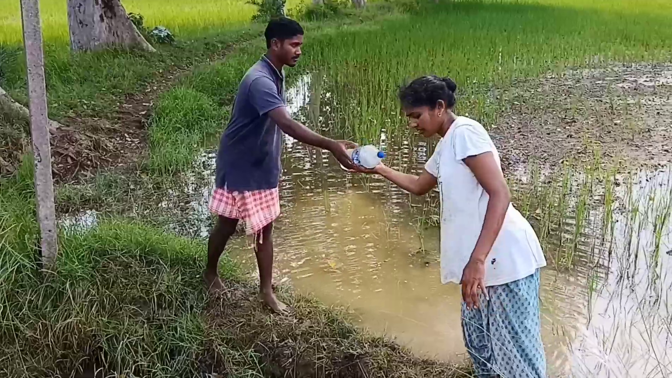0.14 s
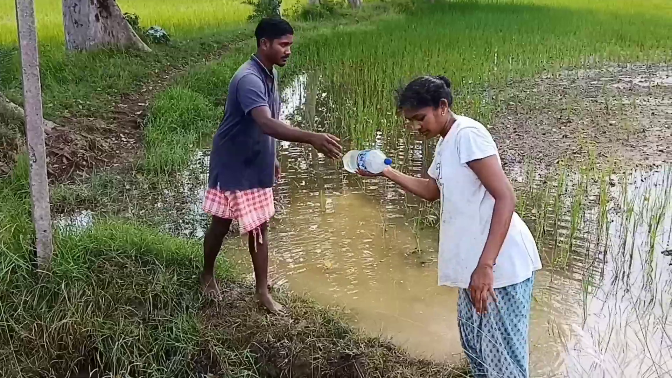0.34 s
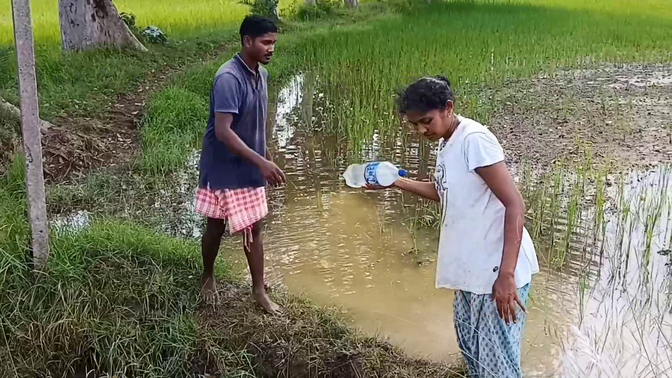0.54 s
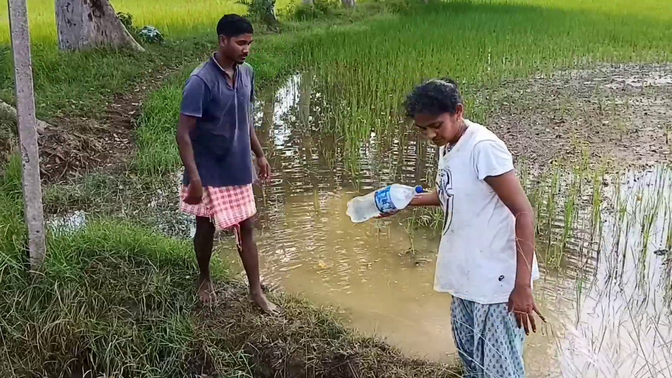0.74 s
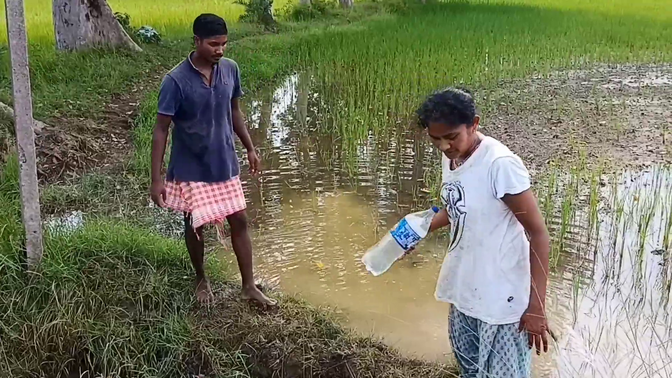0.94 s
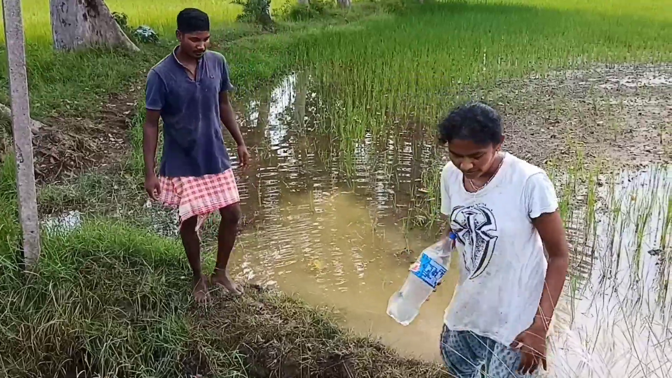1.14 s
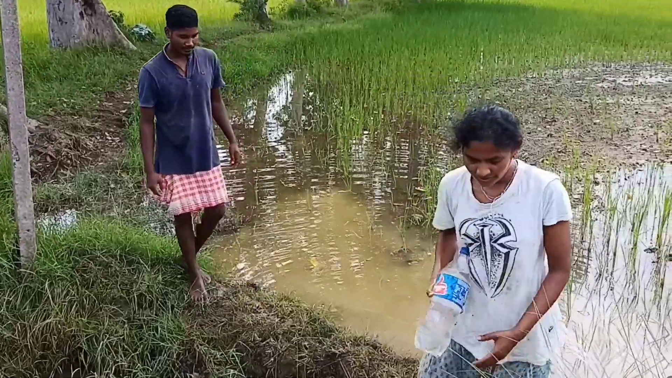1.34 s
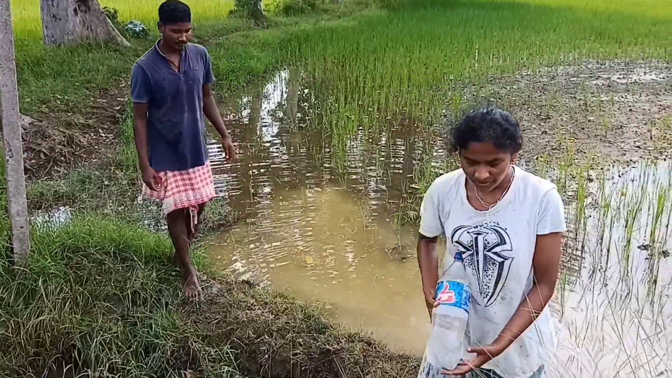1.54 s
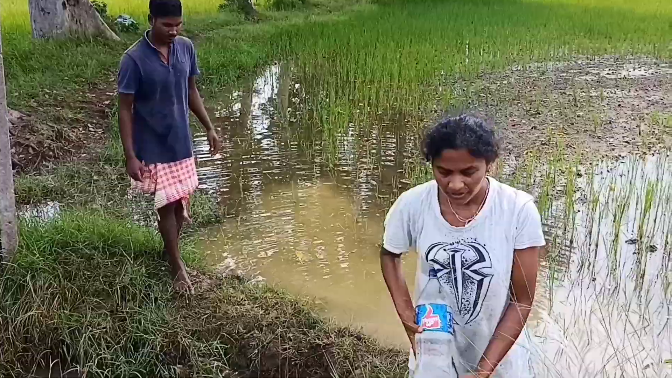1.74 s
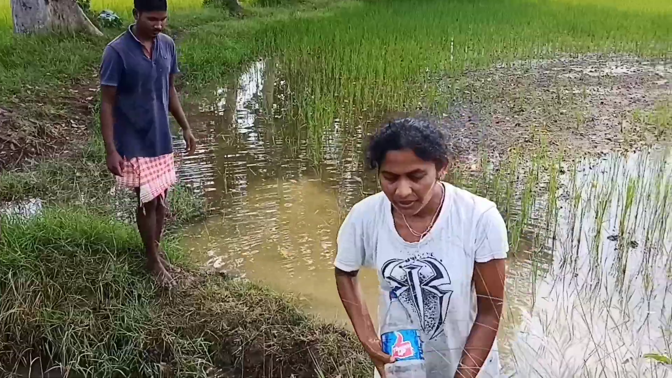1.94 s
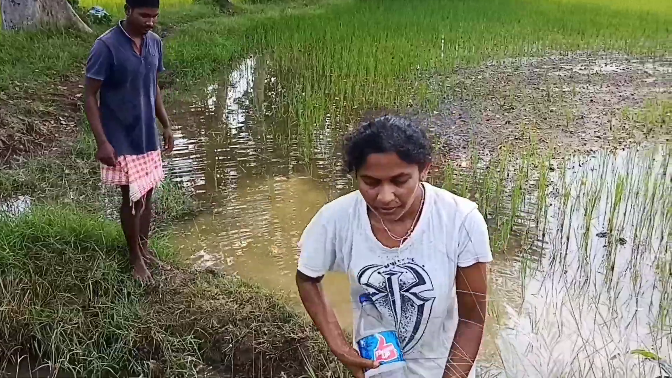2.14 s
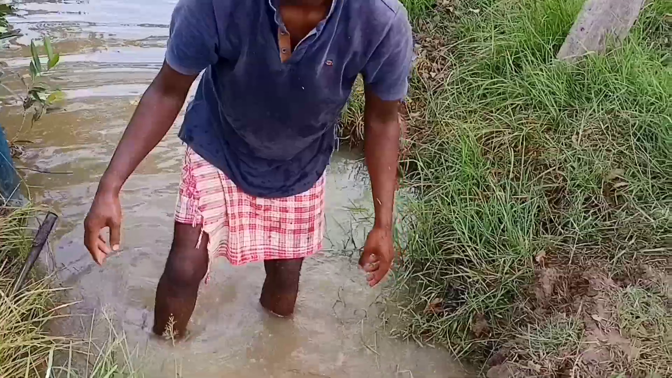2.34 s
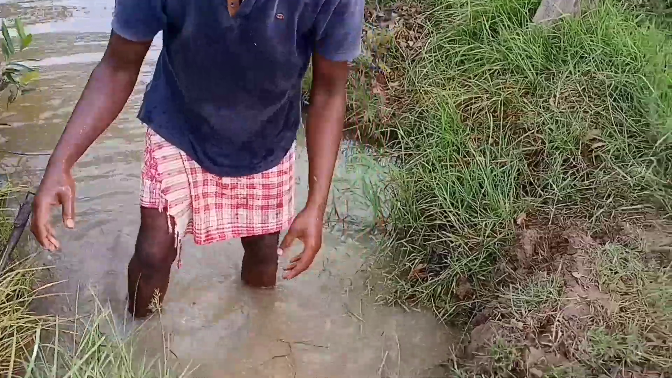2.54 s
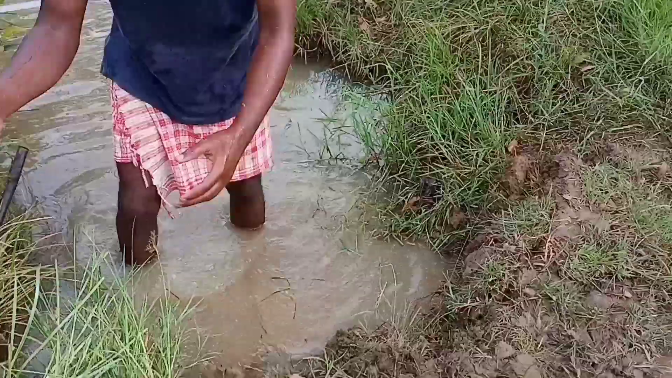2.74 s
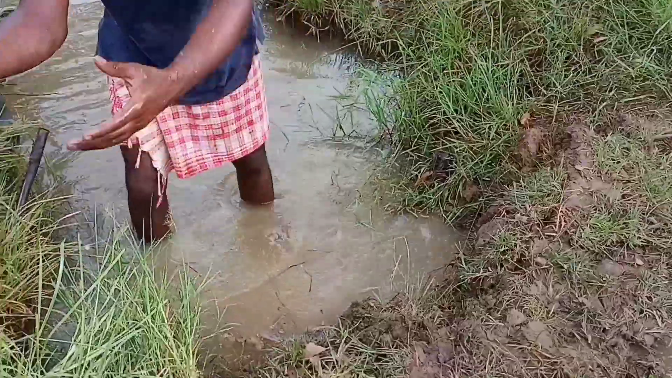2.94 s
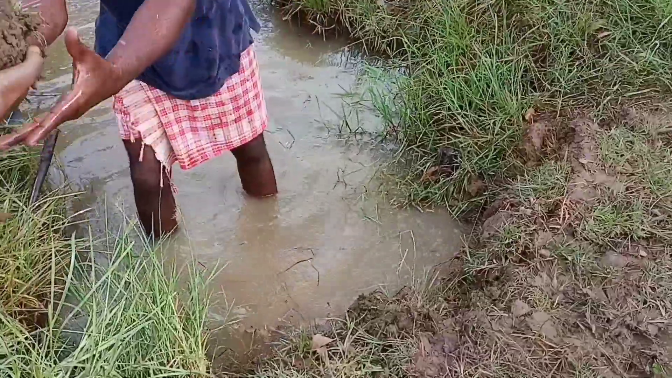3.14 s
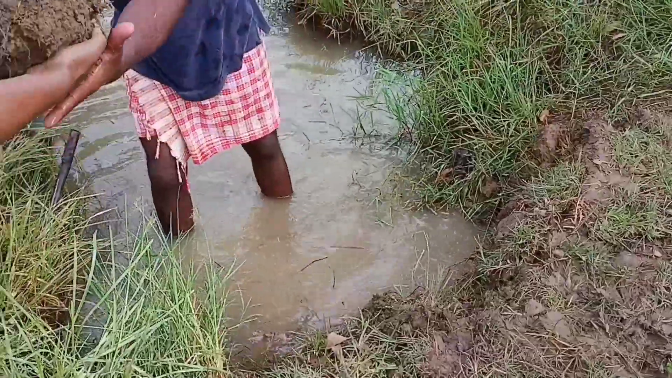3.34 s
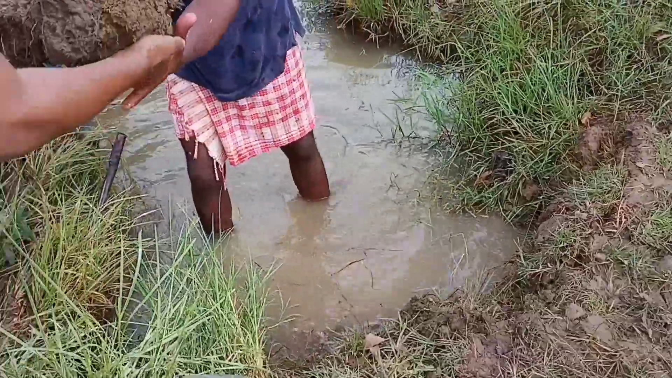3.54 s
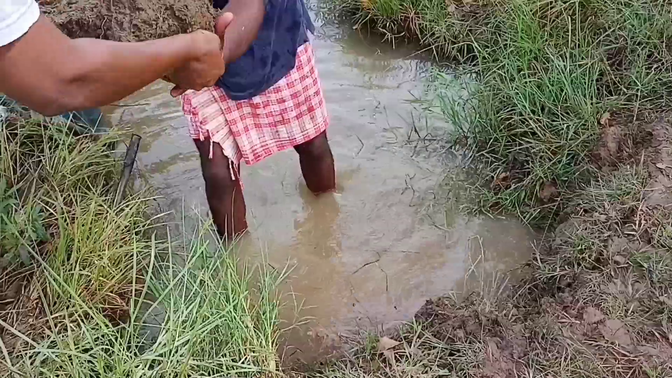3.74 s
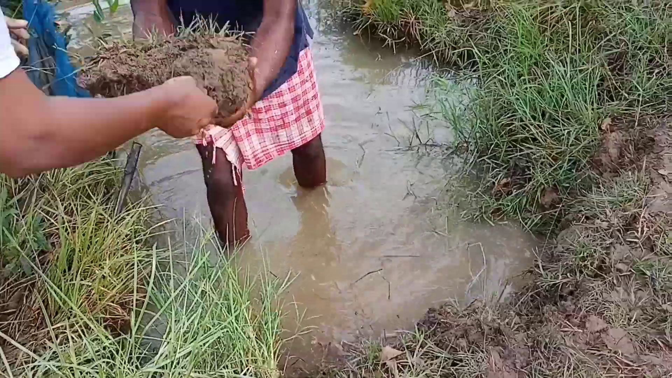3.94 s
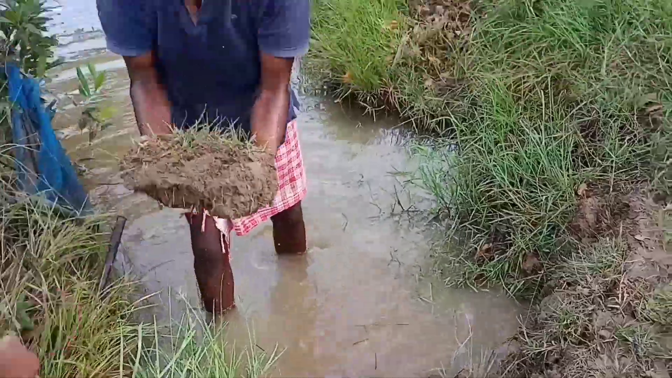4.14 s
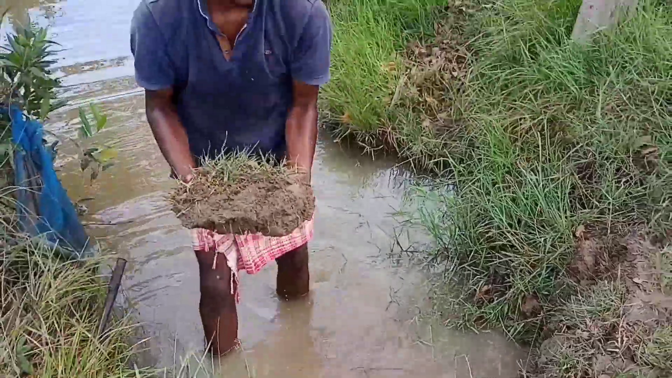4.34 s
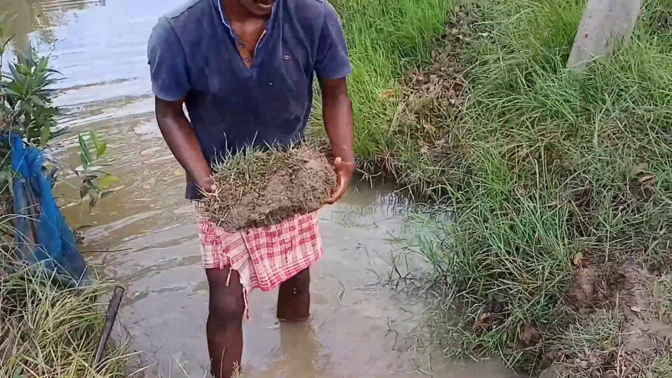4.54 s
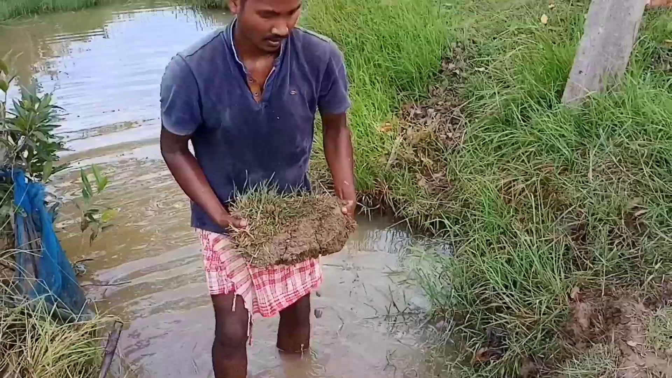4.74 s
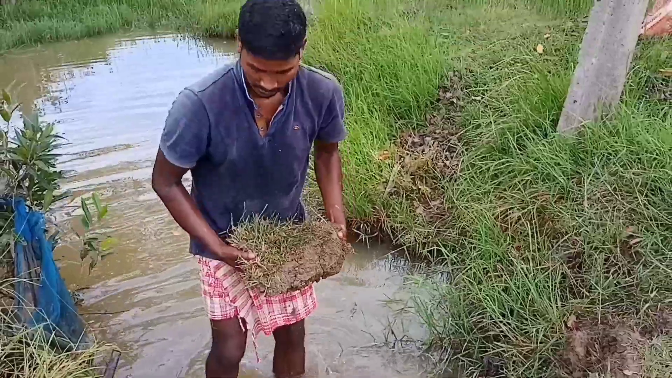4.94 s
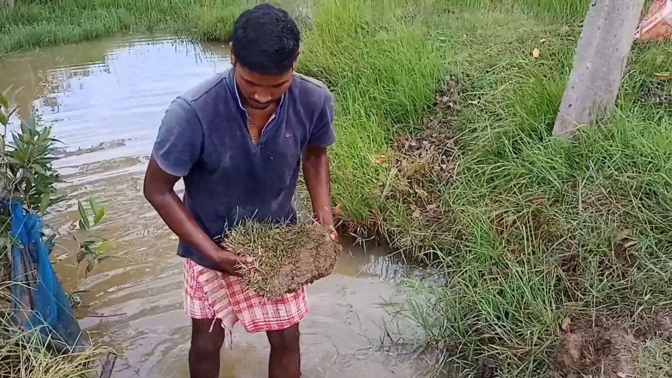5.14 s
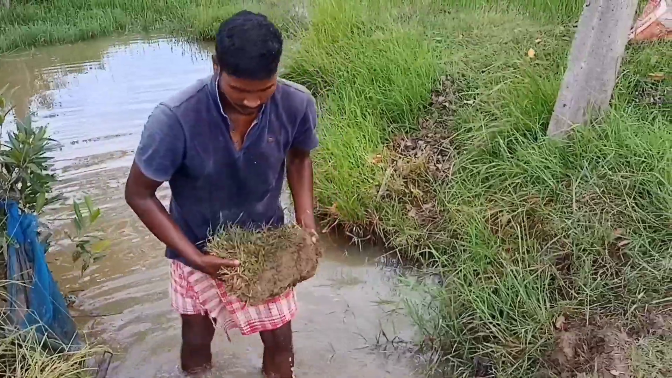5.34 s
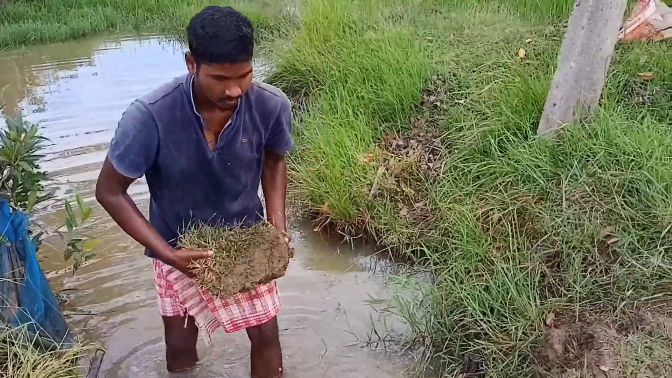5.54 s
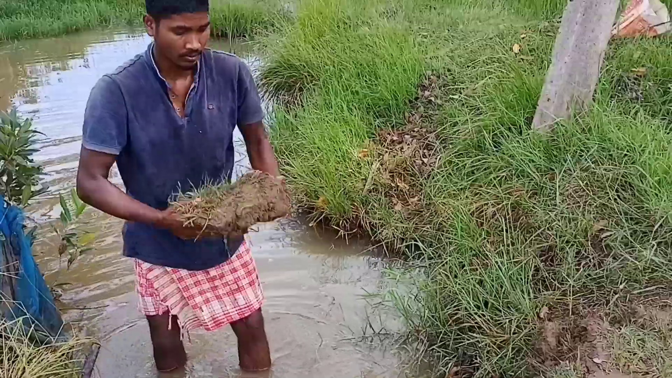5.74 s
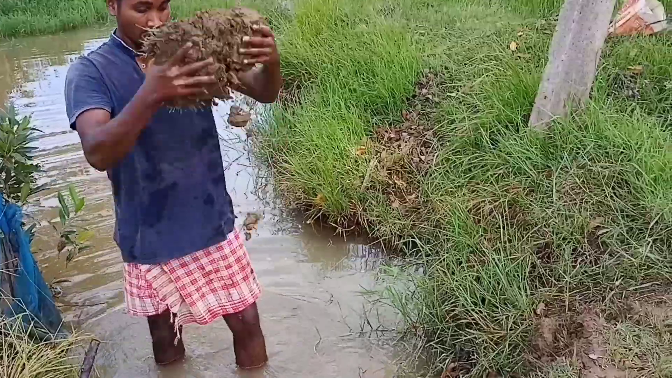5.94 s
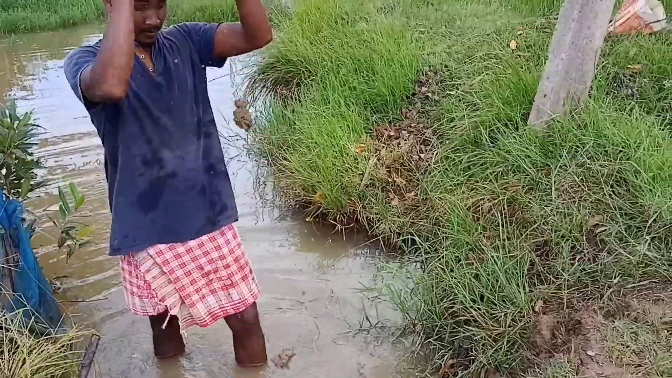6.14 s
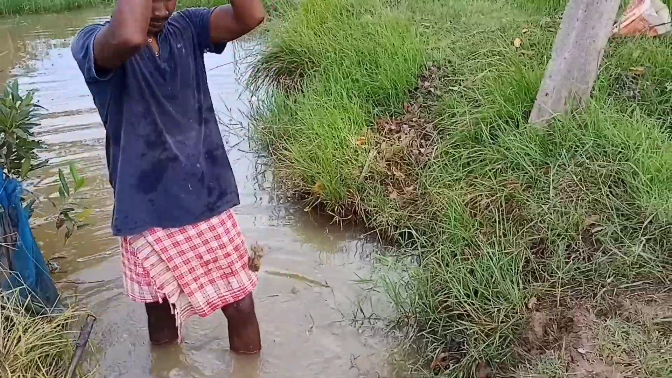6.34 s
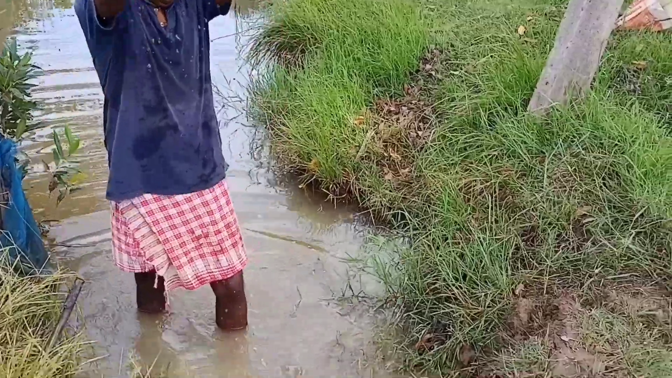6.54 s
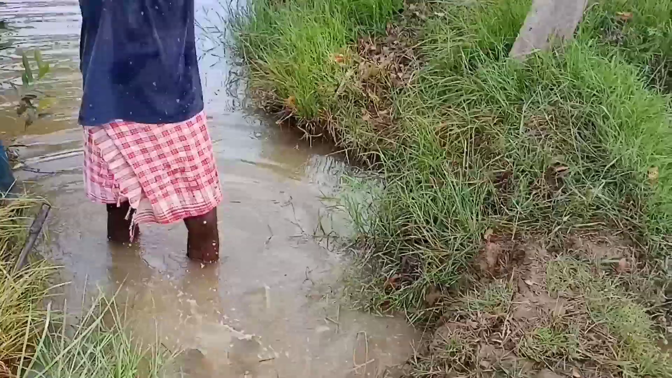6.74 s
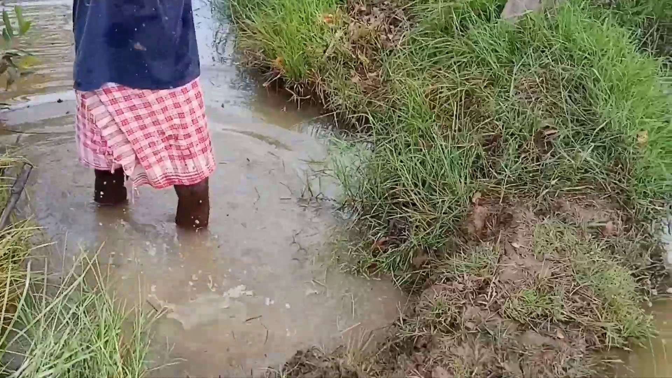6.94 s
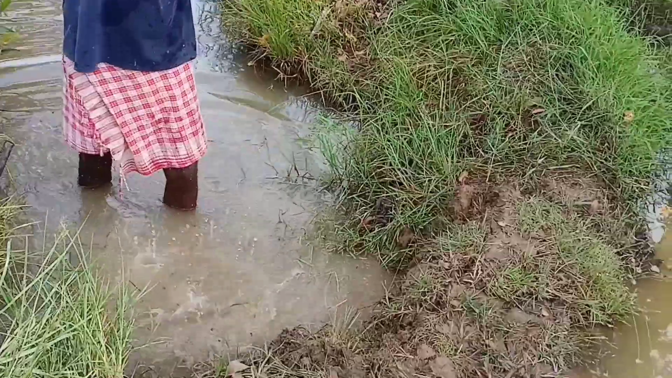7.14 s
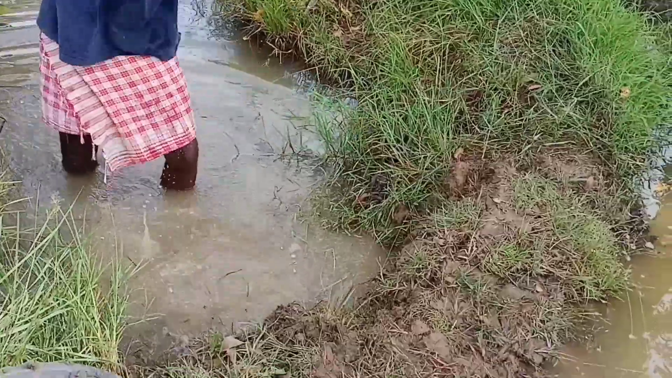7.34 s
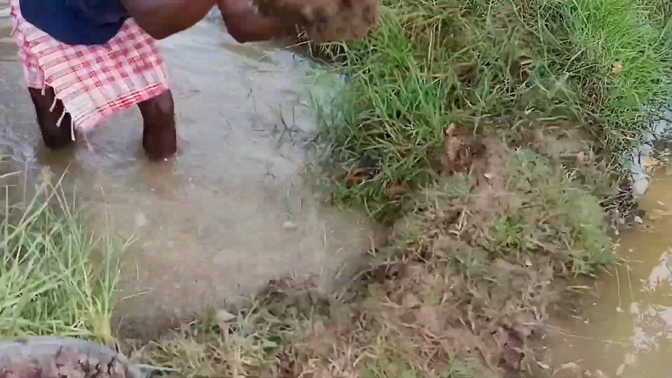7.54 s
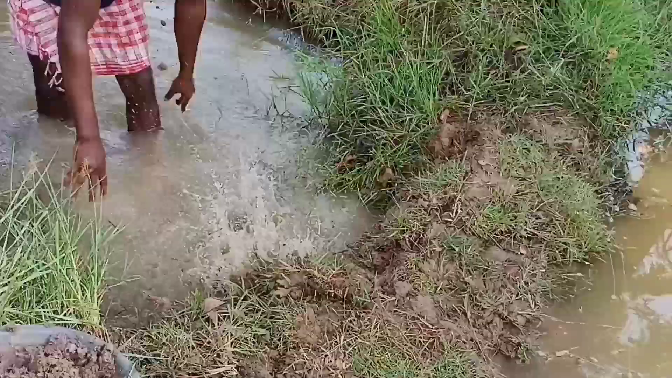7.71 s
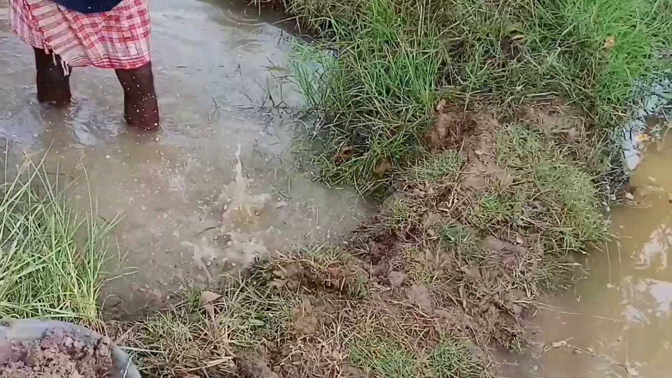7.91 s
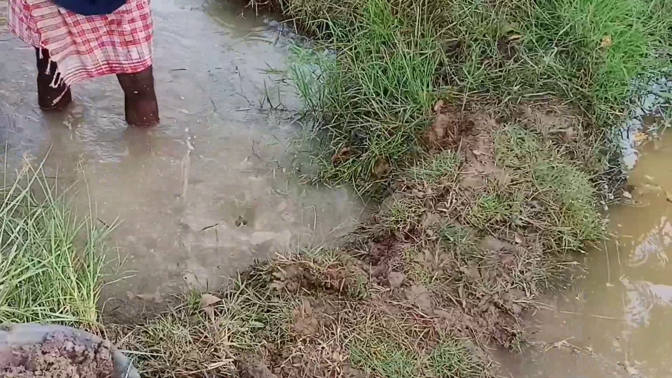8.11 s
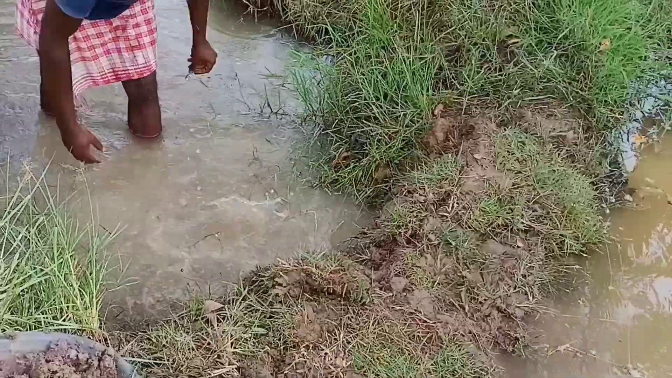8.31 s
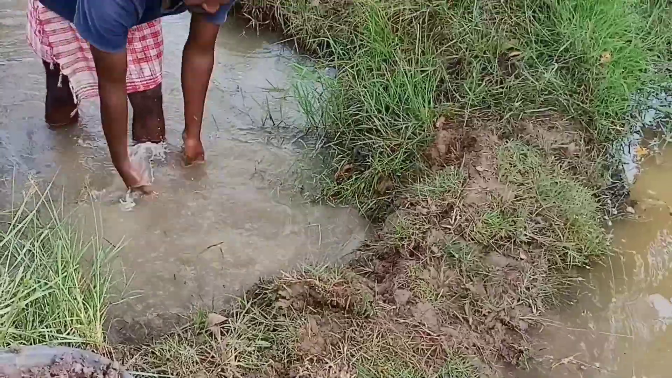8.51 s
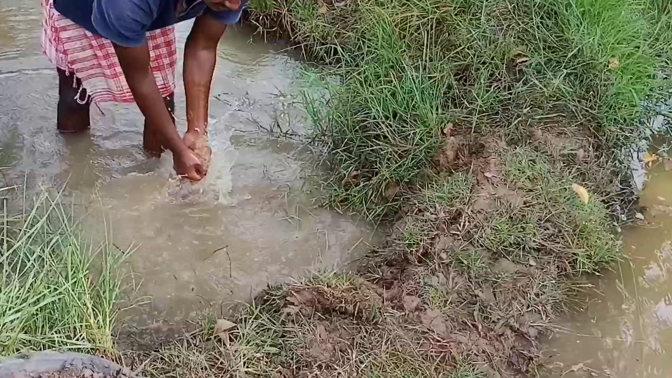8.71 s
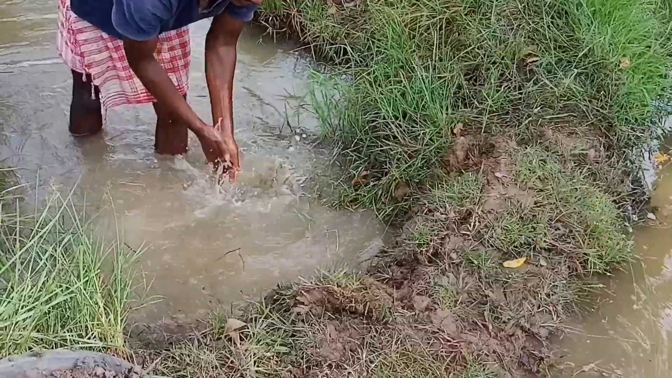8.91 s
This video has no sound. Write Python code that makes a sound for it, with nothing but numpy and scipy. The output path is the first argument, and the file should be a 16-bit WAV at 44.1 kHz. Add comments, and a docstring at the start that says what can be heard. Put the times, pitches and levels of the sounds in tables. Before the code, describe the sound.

Soil falls into shallow muddy water close to the microphone, first as scattered drips and small plops, then as a thicker patter with hollow gurgles. Near the end a heavy clod hits with a loud smack and a low thud, followed by the splashing of rinsing hands. The opening is quiet open countryside, with faint insects and a far engine hum that cuts off early, and birds call in the distance.

```python
"""Soil dropping into muddy water close to the microphone, in a flooded field. Crumbs smack the surface
and air pockets plop behind them; a big clod slaps down in a sheet of spray. Wading and rinsing hands
stir up gurgle, patter and fizz. Insects chirp with their wings, and birds call farther out.
The microphone stands at two spots: first a quiet one with a far pump engine humming, then, after
a brief silence, one beside the pool where the soil falls."""
import sys
import numpy as np
from scipy import signal
from scipy.fft import rfft, irfft, next_fast_len
from scipy.io import wavfile

SR = 44100
rng = np.random.default_rng(int(sys.argv[2]) if len(sys.argv) > 2 else 0)


def master(y):
    """Save y as 16-bit WAV."""
    cut = np.clip(np.atleast_2d(y).T, -1, 1)
    pcm = np.round(cut * 32767)  # scale
    wavfile.write(sys.argv[1], SR, pcm.astype(np.int16))


N = 395469
TIME = np.arange(N) / SR
CUT_S, RESUME_S, FADE_S = 2.241, 2.32, 0.31   # silence between the two spots, then a fade-in

# colour of the open air at each spot: frequency_hz, relative_db
FIRST_AIR_COLOUR = [(25, -36), (60, -14), (110, -9.5), (250, -16.5), (400, -26), (1700, -38.5), (2100, -38),
                    (5500, -39), (10000, -43.5), (15800, -44)]
SECOND_AIR_COLOUR = [(25, -27), (60, -2.5), (100, 2), (200, -3), (280, -9.5), (600, -14.5), (1150, -26),
                     (2900, -23), (5500, -25), (10000, -33), (15800, -28.5)]
# the field all around, one list a spot: time_s, air_db, chorus_db, upper_band_db
# the upper band is insects until about 8.5 s, then the high hiss of spray
FIELD_LEVELS = [
    [(0, -49, -53, -57), (.25, -53, -54, -61), (1.7, -52, -54, -59.5), (2.241, -51.5, -52, -66)],
    [(2.343, -52.5, -58, -60), (2.9, -55.5, -60.5, -65.5), (3.3, -59, -65, -67), (4.7, -57, -63.5, -66.5),
     (5.2, -50.5, -56.5, -67), (6.2, -56, -62.5, -67), (6.6, -50.5, -63, -61), (7.6, -49, -63, -61),
     (8.45, -51, -67, -54.5), (8.97, -50.5, -69, -51)],
]
# engine orders of the far pump: pitch_hz, rms_db
PUMP_ORDERS = [(75.4, -51.5), (145.3, -50), (220.7, -61.5), (360.7, -68.5)]
# a second insect answering the near one: start_s, length_s, rms_db, pitch_hz, strokes_per_s
INSECT_ANSWERS = [(1.55, .155, -55.5, 8060, 240), (1.841, .13, -56.5, 7850, 120)]
# far birds: start_s, length_s, start_hz, end_hz, level_db, rasp_hz
FAR_CALLS = [(0, 0.12, 441, 363, -48.5, 40), (.1, 0.38, 1884, 1726, -67, 30),
             (.834, .03, 2900, 2640, -56, 60), (.87, .15, 4700, 4600, -65, 60),
             (1.062, .13, 5150, 5040, -68, 60), (2.095, 0.084, 1080, 1070, -62, 30),
             (2.986, 0.33, 734, 657, -68.5, 30), (3.374, 0.1, 3880, 3480, -65, 500),
             (3.412, 0.071, 3200, 2820, -60, 150), (3.472, 0.061, 2050, 1820, -59, 60),
             (3.788, 0.1, 3900, 3350, -61, 500), (3.858, 0.042, 2800, 2600, -57, 150),
             (3.925, 0.036, 2700, 1510, -58.5, 80), (4.012, 0.11, 1420, 1390, -74, 30),
             (4.116, 0.13, 695, 650, -66, 30), (4.245, 0.036, 2270, 2990, -60, 80),
             (4.281, 0.048, 2950, 3050, -62, 80), (4.543, 0.086, 2710, 2450, -54.5, 200),
             (4.613, 0.027, 2400, 1730, -58, 80), (4.743, .06, 5930, 5850, -57, 200),
             (5.38, 0.099, 2700, 2600, -48.5, 200), (5.749, .03, 4270, 5250, -47, 170),
             (5.9, 0.078, 2740, 2760, -53, 200), (8.097, 0.19, 1620, 1573, -52.5, 60)]
# a nearer bird repeating one falling whistle: start_s, length_s, start_hz, level_db
NEAR_WHISTLES = [(4.89, .04, 5000, -47), (5.148, .042, 5200, -51), (5.33, .025, 4400, -49),
                 (5.53, .04, 5300, -51), (5.7, .042, 5300, -53), (5.917, .075, 5550, -50),
                 (6.155, .065, 5400, -53)]
# echoes off the banks and trees: delay_s, gain_db
BANK_ECHOES = [(.007, -10), (.018, -13), (.034, -16), (.06, -19)]
# colour of large bubbles, and of patter and spray: frequency_hz, relative_db
GURGLE_COLOUR = [(150, -50), (250, -7.5), (542, -2.5), (944, -8), (1570, -13.5), (1800, -21), (2200, -29),
                 (2860, -31), (4840, -120)]
SPLASH_COLOUR = [(880, -4.5), (1500, -7.5), (2410, -14), (3710, -6), (4520, -11), (6770, -18),
                 (9280, -18.5), (10500, -23), (11500, -20.5), (15800, -23.5)]
# brief sloshes and wet rustles: start_s, length_s, gurgle_db, patter_db, spray_db
SLOSHES = [(.15, 0.14, -68, -70, -66), (1.3, 0.23, -70, -73, -61), (1.78, .1, -85, -62, -59),
           (2.51, .07, -66, -75, -59), (2.575, 0.11, -58.5, -56.5, -63), (2.76, 0.316, -68.5, -78, -82)]
# the pool kept moving by falling soil and rinsing hands: time_s, gurgle_db, patter_db, spray_db
POOL_CHURN = [(4.8, -81, -64, -77), (4.92, -86, -63.5, -59), (5.0, -53.5, -49, -64),
              (5.1, -56, -54.5, -56.5), (5.43, -51, -53.5, -59), (5.66, -62.5, -69, -60.5),
              (5.93, -80, -59, -60), (6.33, -73, -69, -57), (6.4, -46, -43, -49), (6.53, -58, -51.5, -48),
              (6.7, -52, -44, -40), (6.78, -66.5, -49.5, -47.5), (7.05, -56.5, -47.5, -47),
              (7.17, -42, -39, -43.5), (7.38, -53, -46, -55), (7.71, -56, -49, -48.5),
              (7.76, -36.5, -46, -43.5), (7.88, -45.5, -41.5, -43), (8.05, -40, -37, -42),
              (8.12, -58, -48, -46.5), (8.32, -51.5, -54, -54.5), (8.51, -60, -55, -53),
              (8.55, -42.5, -39, -52), (8.62, -37.5, -39, -52), (8.72, -40, -44.5, -44),
              (8.97, -47, -38, -40.5)]
# air pockets closing behind crumbs: start_s, level_db, pitch_hz, t60_s
AIR_POCKETS = [(2.53, -49, 1490, .07), (2.595, -29.5, 215, 0.021), (2.595, -26, 476, 0.0092),
               (2.651, -43, 340, 0.058), (2.858, -54, 280, 0.048), (2.932, -49, 368, .075),
               (4.552, -50, 217, .051), (4.832, -41.5, 352, 0.016), (4.96, -44, 1730, .12),
               (4.968, -44, 960, .092), (4.994, -44, 450, 0.049), (5.022, -35.5, 416, .11),
               (5.044, -36, 513, .084), (5.083, -41, 353, .082), (5.25, -41, 900, 0.11),
               (5.372, -44.5, 385, .07), (5.423, -31, 271, 0.021), (5.547, -30.5, 520, 0.014),
               (6.098, -43.5, 1530, .023), (6.297, -37.5, 272, 0.025), (6.352, -18, 480, 0.0092),
               (6.399, -21.5, 518, 0.087), (6.453, -32, 280, 0.029), (6.497, -21, 470, 0.023),
               (6.528, -27.5, 280, 0.017), (6.625, -25.5, 618, 0.073), (6.647, -25, 230, 0.022),
               (6.668, -31, 224, .04), (6.692, -22.5, 590, 0.054), (6.711, -22, 236, 0.11),
               (6.711, -16.5, 650, 0.036), (6.721, -15, 575, 0.075), (6.814, -36, 1410, 0.035),
               (6.97, -33.5, 1850, 0.055), (7.04, -31.5, 1900, 0.043), (7.078, -30.5, 580, .17),
               (7.129, -32.5, 557, 0.12), (7.153, -25, 1760, 0.033), (7.226, -23, 585, 0.095),
               (7.279, -17, 567, 0.022), (7.379, -24, 1210, 0.032), (7.451, -21, 326, 0.017),
               (7.482, -20.5, 510, 0.012), (7.546, -24.5, 360, 0.016), (7.575, -25.5, 876, 0.032),
               (7.6, -33, 523, 0.18), (7.796, -22.5, 533, .061), (7.809, -20.5, 557, .083),
               (7.831, -23.5, 574, 0.091), (7.857, -19, 520, .059), (7.986, -24, 470, .081),
               (8.105, -36.5, 1410, .046), (8.129, -39, 1460, .043), (8.25, -30, 557, 0.019),
               (8.423, -30, 642, 0.037), (8.587, -30, 1500, 0.1), (8.599, -29, 750, .07),
               (8.612, -29, 503, .09), (8.63, -27, 1554, 0.077), (8.659, -29.5, 403, .087),
               (8.696, -38, 1130, 0.086), (8.724, -30, 560, .053), (8.745, -32, 592, .053),
               (8.818, -25.5, 550, 0.039)]
# drops and crumbs hitting the surface: start_s, level_db, pitch_hz, broad_over_ring_db
SURFACE_HITS = [(1.1907, -37, 2560, -4), (1.3045, -51, 5940, 21.5), (1.374, -34, 2820, -8),
                (1.8332, -46, 3780, 16), (2.596, -36, 3260, 10), (3.5414, -41.5, 5180, -10),
                (3.7519, -46, 4300, -4), (4.0657, -40.5, 3820, -9), (4.2894, -45, 3030, -4),
                (4.3653, -39.5, 3020, -5), (4.4084, -41, 3580, -6), (4.7341, -43, 3950, -26),
                (4.91, -30.5, 4250, -10), (4.955, -28.5, 4580, -2), (5.01, -30, 4650, -9),
                (5.0339, -32, 4730, -10), (5.059, -31.5, 5500, -8), (5.264, -28, 4800, 0),
                (5.314, -24.5, 4060, -16), (5.44, -29, 2620, 1.5), (5.533, -33.5, 5500, -12),
                (5.5486, -27, 4440, -10), (5.5992, -28, 4300, 1.5), (6.099, -37.5, 2870, -4),
                (6.2256, -33, 4870, -14), (6.2911, -37, 4900, -9), (6.3379, -34, 11300, -4),
                (6.353, -23.5, 5330, -1), (6.394, -22.5, 10300, 10.5), (6.424, -31, 8000, -4),
                (6.4962, -13, 4230, 2), (6.568, -27, 5660, 14), (6.6194, -14.5, 8400, 6),
                (6.672, -27, 3730, 1.5), (6.6931, -17, 5070, -8), (6.7123, -12, 3640, -5),
                (6.8099, -20, 7400, -10), (6.8307, -23, 3600, -10), (6.8737, -31, 3590, -4),
                (6.9545, -29.5, 4020, -4), (6.989, -30, 3640, 16), (7.0423, -28, 1870, -4),
                (7.0762, -29, 3190, 4), (7.0974, -20, 11800, -5), (7.1294, -20, 3340, -4),
                (7.1541, -16, 3620, -17), (7.227, -33, 3600, -4), (7.2806, -22, 3840, 3),
                (7.3798, -27.5, 3400, 0), (7.3995, -36, 3650, -4), (7.429, -32, 3570, -6),
                (7.4696, -35, 3300, -4), (7.482, -23, 3070, -8), (7.5088, -31, 3200, -6),
                (7.5732, -27.5, 2610, 10), (7.603, -26, 8700, -12), (7.6719, -30, 2970, 3),
                (7.7154, -9.5, 5550, 3.5), (7.7332, -9.5, 5860, 9), (7.7796, -21.5, 5000, 3),
                (7.8251, -30, 3400, -8), (7.848, -24, 5470, 1), (7.8939, -33, 5160, -6),
                (7.9268, -21.5, 5900, -7), (7.9873, -21, 11700, -5), (8.0138, -31, 3050, 14),
                (8.092, -24.5, 3500, -4), (8.2012, -30.5, 3360, 10), (8.253, -26, 3430, 6.5),
                (8.377, -25.5, 4950, 7.5), (8.423, -28, 3730, -8), (8.5135, -29.5, 3830, -6),
                (8.5446, -24, 2600, 4), (8.5803, -17, 3400, -13), (8.6467, -24.5, 3430, 7.5),
                (8.7792, -18.5, 3730, -4), (8.8144, -18.5, 9450, -9), (8.911, -23, 3320, 5)]
# the big clod pushing on the water: start_s, level_db, pitch_hz, t60_s
CLOD_PUSHES = [(7.7245, -12, 260, .025), (7.7338, -2, 150, .035), (7.7418, -3, 70, .058)]
# its spray, thrown at first touch and at the slap: start_s, length_s, rms_db
CLOD_SPRAY = [(7.711, 0.015, -31.5), (7.725, 0.01, -18)]


def from_db(db):
    """Decibels to gain."""
    return 10 ** (np.asarray(db) / 20)


def rms_one(x):
    """Scale to rms 1."""
    return x / np.sqrt(np.mean(x ** 2) + 1e-20)


def add(out, start_s, piece):
    """Mix a piece in at a time."""
    i = round(start_s * SR)
    out[i:i + len(piece)] += piece[:N - i]


def level_curves(*tables):
    """A gain curve for each dB column; silent outside the tables."""
    times, *columns = np.transpose(np.vstack(tables))
    on = sum((TIME >= rows[0][0]) & (TIME <= rows[-1][0]) for rows in tables)
    return [on * from_db(np.interp(TIME, times, column)) for column in columns]


def swells(rows, rise_s, t60_s):
    """A gain curve for each dB column: every row rises, holds and dies away; powers add."""
    power = 0
    for start_s, length_s, *levels_db in rows:
        rise = np.clip((TIME - start_s) / rise_s, 0, 1)
        decay = from_db(-60 * np.maximum(TIME - start_s - length_s, 0) / t60_s)
        power = power + np.outer(from_db(levels_db), rise * decay) ** 2
    return np.sqrt(power)


def drift(rate_hz):
    """Smooth random wander with spread 1."""
    step, settle = 40, 2000
    pole = np.exp(-2 * np.pi * rate_hz * step / SR)
    noise = rng.standard_normal(N // step + settle + 2)
    slow = signal.lfilter([1], [1, -2 * pole, pole * pole], noise)[settle:]
    return np.interp(np.arange(N) / step, np.arange(len(slow)), rms_one(slow))


def colour(x, spectrum):
    """Shape a signal by (Hz, dB) points and scale it to rms 1."""
    size = next_fast_len(N)
    points_hz, points_db = np.transpose(spectrum)
    bins_hz = np.arange(size // 2 + 1) * SR / size
    gain = from_db(np.interp(np.log(bins_hz + 1), np.log(points_hz), points_db))
    return rms_one(irfft(rfft(x, size) * gain, size)[:N])


def filtered(x, hz, kind, order=2):
    """Low-, high- or band-pass with a flat top."""
    return signal.sosfilt(signal.butter(order, hz, kind, fs=SR, output="sos"), x)


def band(x, hz, width_hz):
    """One band of a signal, at rms 1."""
    return rms_one(filtered(x, [hz - width_hz / 2, hz + width_hz / 2], "band"))


def resonance(x, hz, width_hz):
    """Two-pole peak, gain 1 on top."""
    r = np.exp(-np.pi * width_hz / SR)
    gain = (1 - r * r) / 2
    return signal.lfilter([gain, 0, -gain], [1, -2 * r * np.cos(2 * np.pi * hz / SR), r * r], x + 1e-18)


def grains(per_s, spread_db, low_hz, high_hz, cycles, clump_db):
    """Clumped random clicks dealt to 16 briefly ringing resonators; rms 1 whatever the rate."""
    sizes = from_db(spread_db * np.minimum(rng.exponential(1, N), 4)) / np.sqrt(per_s)
    signs = rng.choice([-1, 1], N)
    clicks = sizes * signs * (rng.random(N) < per_s * from_db(clump_db * drift(25)) / SR)
    dealt = rng.integers(0, 16, N)
    out = np.zeros(N)
    for k, hz in enumerate(np.geomspace(low_hz, high_hz, 16)):
        swell = from_db(6 * drift(5.85))
        out += resonance(clicks * (dealt == k) * swell, hz, 2.14 * hz / cycles)
    return rms_one(out)


def open_field():
    """Air all around and two bands of massed insects; the upper one throbs and ends as spray hiss."""
    air, chorus, upper = level_curves(*FIELD_LEVELS)
    throb_phase = 2 * np.pi * 8.3 * np.cumsum(1 + .2 * drift(1)) / SR
    upper = upper * from_db(2 * np.tanh(3 * np.sin(throb_phase)))
    noise = rng.standard_normal((4, N))
    first_air, second_air = colour(noise[0], FIRST_AIR_COLOUR), colour(noise[1], SECOND_AIR_COLOUR)
    out = air * np.where(TIME < CUT_S, first_air, second_air)
    out += chorus * from_db(drift(40)) * band(noise[2], hz=6905, width_hz=880)
    out += upper * from_db(drift(40)) * band(noise[3], hz=9120, width_hz=380)
    return out


def far_pump():
    """A distant engine, heard at the first spot only; its orders waver together as the speed hunts."""
    engine_time = np.cumsum(1 + .01 * drift(2)) / SR
    out = np.zeros(N)
    for hz, rms_db in PUMP_ORDERS:
        out += np.sqrt(2) * from_db(rms_db + 2 * drift(10)) * np.sin(2 * np.pi * hz * engine_time)
    return out * (TIME < CUT_S)


def near_insects(first_s=.085, every_s=.1197, first_db=-60.5, swell_db_per_s=3.5):
    """One insect chirps steadily, another answers: trains of wing strokes ring a broad resonance."""
    steady = [(first_s + s, .081, first_db + swell_db_per_s * s, 8490, 110)   # columns as in the answers
              for s in every_s * np.arange(14)]
    out = np.zeros(N)
    for chirps, width_hz in (steady, 996), (INSECT_ANSWERS, 332):
        for start_s, length_s, rms_db, hz, strokes_per_s in chirps:
            strokes = np.zeros(round((length_s + .024) * SR))
            onsets = (np.arange(0, length_s, 1 / strokes_per_s) * SR).astype(int)
            teeth = rng.standard_normal((40, 3))[:len(onsets)]   # a stroke catches on three teeth
            strokes[onsets[:, None] + np.arange(3) * 23] = np.sign(teeth) + .22 * teeth
            add(out, start_s, from_db(rms_db) * band(strokes, hz, width_hz))
    return out


def birds(whistle_fall_hz_per_s=29000, whistle_rasp_hz=100):
    """Gliding calls across the field, roughened by noise and smeared by echoes off banks and trees."""
    whistles = [(start_s, length_s, hz, hz - whistle_fall_hz_per_s * length_s, db, whistle_rasp_hz)
                for start_s, length_s, hz, db in NEAR_WHISTLES]
    direct = np.zeros(N)
    for start_s, length_s, start_hz, end_hz, level_db, rasp_hz in whistles + FAR_CALLS:
        along = np.linspace(0, 1, round(length_s * SR))
        noise = rng.standard_normal(SR // 2)[:len(along)]
        share = min(rasp_hz / 300, 1)   # a wider rasp leaves less of the pure tone
        rasp = 1 - share + share * rms_one(filtered(noise, rasp_hz, "low"))
        tone = np.sin(2 * np.pi * np.cumsum(start_hz + (end_hz - start_hz) * along) / SR)
        arch = np.sin(np.pi * along) ** .5
        add(direct, start_s, from_db(level_db) * arch * rasp * tone)
    out = direct.copy()
    for delay_s, gain_db in BANK_ECHOES:
        add(out, delay_s, from_db(gain_db) * direct)
    return out


def drips():
    """Faint stray drips off wet grass and legs."""
    return from_db(-76) * grains(60, 3.5, 1500, 9000, cycles=8, clump_db=6)


def falling_spray(share_db=-24, t60_s=.097):
    """Gain curve of the spray that each smack throws up, dying away as it falls back."""
    thrown = np.zeros(N)
    for start_s, level_db, *_ in SURFACE_HITS:
        thrown[int(start_s * SR)] = from_db(level_db + share_db)
    return signal.lfilter([1], [1, -from_db(-60 / (t60_s * SR))], thrown)


def stirred_water():
    """Bubbles gurgle, drops patter, spray fizzes; harder stirring packs bubbles and drops closer."""
    gurgle, patter, spray = swells(SLOSHES, rise_s=.03, t60_s=.15) + level_curves(POOL_CHURN)
    falling = falling_spray()
    bubbles = grains(600 + 2500 * gurgle / from_db(-40.5), 2.8, 288.4, 2186, cycles=22, clump_db=3.5)
    drops = grains(1000 + 3000 * patter / from_db(-40), 3.5, 1500, 9000, cycles=19, clump_db=2.8)
    fizz = grains(5000, 3.5, 6000, 15000, cycles=8, clump_db=2)
    return (gurgle * colour(bubbles, GURGLE_COLOUR)
            + (patter + falling) * colour(drops, SPLASH_COLOUR)
            + (spray + from_db(3) * falling) * colour(fizz, SPLASH_COLOUR))


def plops_and_thuds():
    """Air pockets ring and rise in pitch as they near the surface; the clod's low pushes sink in pitch."""
    out, t = np.zeros(N), TIME[:round(.3 * SR)]
    wobble = np.pad(drift(70), (0, len(t)))   # mud shakes the walls of a pocket
    for rows, glide_oct, shake_oct in (AIR_POCKETS, .15, .06), (CLOD_PUSHES, -.13, 0):
        for start_s, level_db, hz, t60_s in rows:
            glide = glide_oct * np.minimum(t / t60_s, 1)
            shake = shake_oct * wobble[round(start_s * SR):][:len(t)]
            phase = 2 * np.pi * np.cumsum(hz * 2 ** (glide + shake)) / SR
            attack = np.minimum(t / (.018 * t60_s), 1)
            add(out, start_s, attack * from_db(level_db - 60 * t / t60_s) * np.sin(phase))
    return out


def smacks():
    """Drops and crumbs strike the water: a noise burst, part broad, part ringing at the drop's size."""
    out, t = np.zeros(N), TIME[:round(.06 * SR)]
    for start_s, level_db, hz, broad_db in SURFACE_HITS:
        t60_s = .033 * np.exp(.025 * (level_db + 15))   # a harder smack lasts longer
        burst = rng.standard_normal(len(t)) * from_db(-60 * t / t60_s) * np.minimum(t / .00045, 1)
        broad = signal.lfilter([1, -1], [1, -.6], burst)
        ring = resonance(burst, hz, hz / 9.3)
        smack = from_db(broad_db) * broad / abs(broad).max() + ring / abs(ring).max()
        add(out, start_s, from_db(level_db - 6) * smack)
    return out


def clod_hiss():
    """A burst of hiss as the big clod touches the water, and a louder one as it slaps down."""
    return swells(CLOD_SPRAY, rise_s=.0066, t60_s=.11)[0] * colour(rng.standard_normal(N), SPLASH_COLOUR)


def scene():
    """Two spots in mono, with a brief burst of stereo treble hiss added at the slap."""
    sheet = clod_hiss()
    side = from_db(-5) * filtered(clod_hiss(), 4500, "high", order=12)
    surroundings = drips() + open_field() + far_pump() + near_insects() + birds()
    fade_in = (TIME > RESUME_S) * np.clip(.11 + (TIME - RESUME_S) / FADE_S, 0, 1)
    fade = np.where(TIME < CUT_S, 1, fade_in)
    mid = fade * (surroundings + stirred_water()) + plops_and_thuds() + smacks() + sheet
    return np.array([mid + side, mid - side])


def record(dry, low_cut_hz=50, ceiling=.95, stopband_hz=16222.5, dc_offset=-.00013):
    """The microphone drops the deepest bass; peaks are rounded, the top is cut, a small offset stays."""
    heard = filtered(dry, low_cut_hz, "high")
    rounded = heard / (1 + (heard / ceiling) ** 4) ** .25
    top_cut = signal.cheby2(14, 70, stopband_hz, fs=SR, output="sos")
    return signal.sosfilt(top_cut, rounded + dc_offset)


dry = scene()
out = record(dry)
master(out)
```